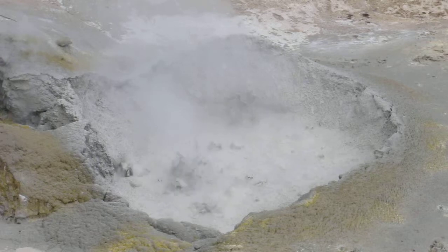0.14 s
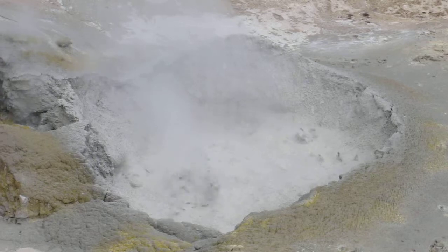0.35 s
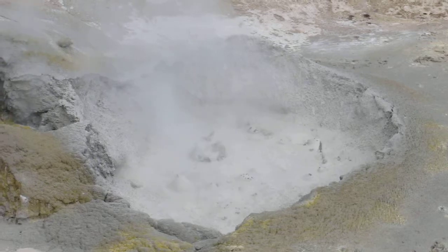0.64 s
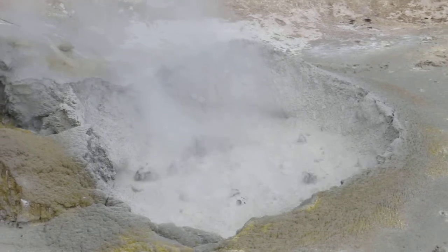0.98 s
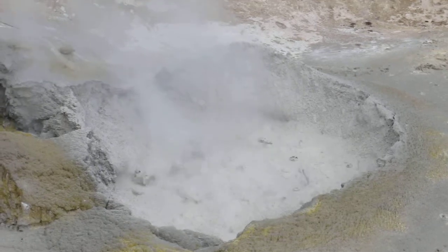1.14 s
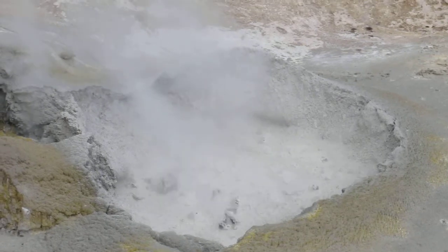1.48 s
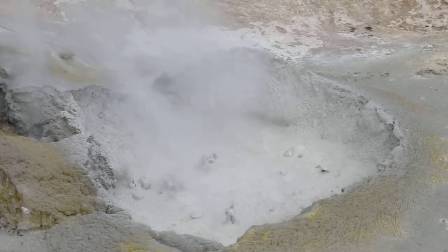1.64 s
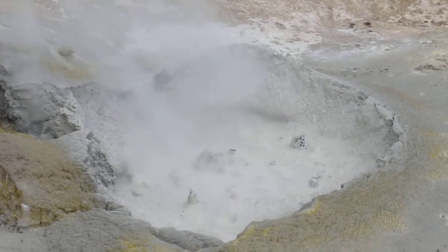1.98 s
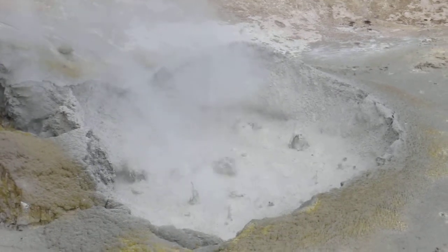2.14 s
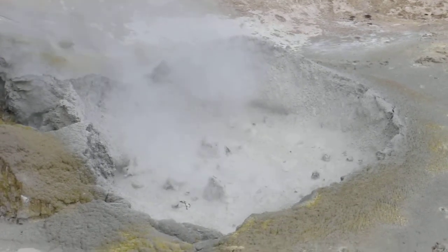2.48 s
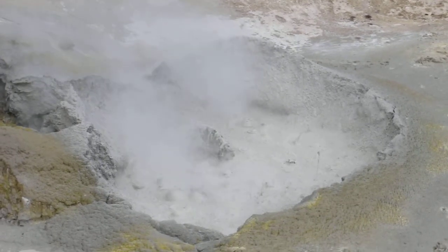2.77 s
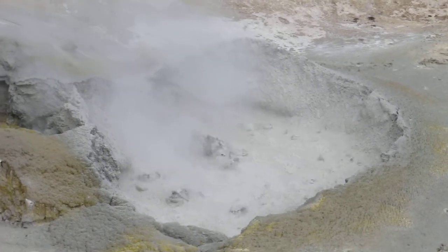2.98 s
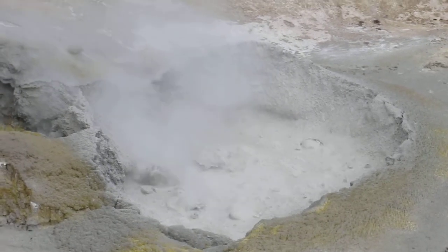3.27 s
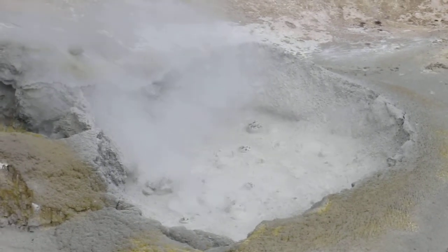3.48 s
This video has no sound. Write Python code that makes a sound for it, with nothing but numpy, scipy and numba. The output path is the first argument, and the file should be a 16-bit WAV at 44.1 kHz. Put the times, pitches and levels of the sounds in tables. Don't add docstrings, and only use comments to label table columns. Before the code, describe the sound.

Thick boiling mud bubbles, plops and spatters over a low churning rumble and steam hiss outdoors

```python
import sys
import numpy as np
from scipy import signal
from scipy.fft import rfft, irfft, next_fast_len
from scipy.io import wavfile
from scipy.ndimage import uniform_filter1d
from numba import njit

SR = 44100
rng = np.random.default_rng(int(sys.argv[2]) if len(sys.argv) > 2 else 0)


def volts(x):
    e = np.asarray(x, float) / 20
    return 10 ** e


def materialize(psi):
    bounded = np.clip(np.atleast_2d(psi).T, -1, 1)
    quanta = np.round(bounded * 32767).astype(np.int16)
    wavfile.write(sys.argv[1], SR, quanta)


N = 159642
PORT_LAG_S = 1.5e-5


def columns(table):
    return np.array(table, float).T


def follow(curve, s):
    return np.interp(s, *columns(curve))


def spectrum(table, hz):
    table_hz, db = columns(table)
    return np.interp(np.log(hz), np.log(table_hz), db)


def level(x, db):
    return x * volts(db) / np.sqrt(np.mean(x ** 2))


def walk(rate):
    hold = int(SR / rate)
    steps = np.repeat(rng.standard_normal(N // hold + 1), hold)
    return 1.3 * uniform_filter1d(uniform_filter1d(steps, hold), hold)[:N]


@njit
def ring(out, start, w, tau, size, glide, lag):
    for k in range(len(start)):
        z = size[k] * np.e / tau[k] + 0j
        step = np.exp(1j * w[k] - 1 / tau[k])
        rise = np.exp(1j * w[k] * glide / tau[k])
        turn = np.exp(1j * w[k] * lag[k])
        for i in range(int(7 * tau[k])):
            z *= step
            step *= rise
            j = start[k] + i
            if 0 <= j < out.shape[1]:
                out[0, j] += i * z.imag
                out[1, j] += i * (z * turn).imag
    return out


def bubbles(s, db, hz, cycles, glide):
    tau = np.maximum(cycles * SR / hz, 1.5)
    lag = PORT_LAG_S * SR * rng.standard_normal(len(s))
    w = 2 * np.pi * np.minimum(hz / (1 + glide), 11000) / SR
    start = (s * SR - tau).astype(np.int64)
    return ring(np.zeros((2, N)), start, w, tau, volts(db), 1. * glide, lag)


def swarm(curve, sizes, trim_db, scatter_db, patchy_db, rate, cycles, glide, count):
    when, pitch, strength = rng.random((count, 3)).T
    s = when * N / SR
    lowest, highest = sizes[0][0], sizes[-1][0]
    hz = lowest * (highest / lowest) ** pitch ** 0.749
    db = follow(curve, s) + trim_db + spectrum(sizes, hz) - scatter_db * np.log(strength)
    patches = walk(rate)[(s * SR).astype(int)]
    return bubbles(s, db + patchy_db * patches, hz, cycles, glide)


def clusters(start, length, db, hz, octaves, count):
    c = rng.random((len(start), count, 4))
    s = start[:, None] + length[:, None] * (.7 * c[..., 0] ** 1.2 + .3 * c[..., 1] ** 2)
    off = octaves * np.log(c[..., 2] / (1 - c[..., 2])) / 1.7
    f = np.clip(hz[:, None] * 2 ** off, 700, 11000)
    per_drop = db + 10 * np.log10(length * SR / count)
    drop_db = per_drop[:, None] - 10 * np.log10(SR / f) - 1.5 * np.log(c[..., 3])
    return bubbles(s.ravel(), drop_db.ravel(), f.ravel(), cycles=1.5, glide=.03)


# start_s, level_db
CHURN_CURVE = [
    (0, -31.5),
    (.9, -30),
    (2, -29.5),
    (3.62, -27.5),
]
# pitch_hz, level_db per bubble
CHURN_BUBBLES = [
    (30, 1.5),
    (40, 13),
    (51, -5),
    (68, 2),
    (120, 6.5),
    (250, 9.5),
    (380, -10),
]


def churn():
    return swarm(CHURN_CURVE, CHURN_BUBBLES, -9.0, 0.25, 0.2, rate=8.4, cycles=1.0, glide=0.046, count=700)


# start_s, level_db
SPATTER_CURVE = [(0, -39), (.2, -40.5), (.32, -38), (.5, -35), (.75, -38), (.95, -38), (1.2, -39),
                 (1.35, -38.5), (1.7, -40), (2.0, -42), (2.15, -40), (2.3, -43), (2.55, -40.5), (2.68, -37),
                 (2.95, -41.5), (3.3, -36.5), (3.62, -38)]
# pitch_hz, level_db per drop
SPATTER_DROPS = [
    (1000, -11),
    (2500, -6.5),
    (5000, -19),
    (10500, -4.5),
]


def falling_drops():
    return swarm(SPATTER_CURVE, SPATTER_DROPS, 4.2, 2.2, 1.2, rate=12, cycles=1.2, glide=0.077, count=10000)


def spits(count=320):
    when, strength, size, pitch = rng.random((count, 4)).T
    s = when * N / SR
    db = follow(SPATTER_CURVE, s) - 6 - 3.5 * pitch - np.log(strength)
    return clusters(s, .0015 + 0.008 * size ** 2, db, 900 * 8.5 ** pitch, octaves=.9, count=10)


# pitch_hz, level_db per Hz
STEAM_COLOUR = [
    (20, -10),
    (330, -4),
    (430, -9.5),
    (1050, -16),
    (1280, -21.5),
    (3000, -28),
    (6000, -31.5),
    (15000, -47),
]


def steam():
    n = next_fast_len(N)
    f = np.maximum(np.fft.rfftfreq(n, 1 / SR), 1)
    mid, side = rfft(rng.standard_normal((2, n)))
    width = np.clip(f / 14000, .03, .7)
    hiss = volts(spectrum(STEAM_COLOUR, f)) * (mid + width * side * np.array([[1], [-1]]))
    spatter = follow(SPATTER_CURVE, np.arange(N) / SR)
    swell = 0.64 * (spatter - spatter.mean())
    flicker = .5 * walk(18)
    total = np.zeros((2, N))
    for k in range(10):
        octave = np.cos(np.clip(np.log2(f / 30) - k, -1, 1) * np.pi / 2) ** 2
        band = irfft(hiss * octave, n)[:, :N]
        total += band * volts(swell * (k > 5) + flicker + .6 * walk(9))
    return level(total, -30)


def wind():
    lowpass = signal.butter(2, 30.2, fs=SR, output="sos")
    buffeting = signal.sosfilt(lowpass, rng.standard_normal((2, N)))
    return level(buffeting * volts(1.0 * walk(4.5)), -36)


# start_s, level_db
SEETHE_CURVE = [
    (0, -46),
    (.5, -34),
    (1, -35),
    (1.4, -39),
    (2.1, -36),
    (2.7, -37),
    (3.15, -31.5),
    (3.62, -34),
]
# pitch_hz, level_db per bubble
SEETHE_BUBBLES = [
    (520, 0),
    (780, 3.5),
    (1100, -11.5),
]


def seethe():
    return swarm(SEETHE_CURVE, SEETHE_BUBBLES, -1.5, 1.5, 1.7, rate=11, cycles=1.085, glide=0.063, count=600)


# start_s (peak), level_db (peak), pitch_hz
GULP_EVENTS = [(.06, -29.5, 111), (.115, -26.5, 280), (.18, -31, 121), (.479, -21.5, 204), (.741, -26, 294),
               (.831, -28, 190), (.968, -24.5, 55), (1.058, -25, 128), (1.095, -23.5, 260),
               (1.322, -25, 77), (1.35, -24.5, 116), (1.382, -21, 207), (1.57, -27.5, 278),
               (1.73, -29, 37.8), (2.09, -25.5, 86.5), (2.134, -23, 278), (2.112, -21.5, 188),
               (2.124, -20, 166), (2.129, -26.5, 122), (.6, -29.5, 150), (1.24, -32, 55), (1.48, -31, 197),
               (1.545, -28, 188), (3.2, -24.5, 60.6), (3.05, -30.5, 59.3), (.9, -32, 280), (2.3, -23, 210),
               (2.435, -29.5, 127), (2.625, -23, 93), (2.684, -23.5, 315), (2.73, -26.5, 40.4),
               (2.921, -21, 193), (3.098, -25.5, 107), (3.15, -24.5, 234), (3.278, -22.5, 247)]


def gulps():
    s, db, hz = columns(GULP_EVENTS)
    return bubbles(s, db + 3, hz, cycles=1.38, glide=0.086)


# start_s (peak), level_db (peak), pitch_hz
PLOP_EVENTS = [(.172, -20, 1820), (.377, -33, 1560), (0.732, -18, 573), (.947, -21, 680), (1.566, -23, 694),
               (1.575, -23, 1210), (2.2232, -18.5, 1550), (2.227, -22, 1480), (2.241, -19, 2880),
               (3.04, -22, 2000), (3.251, -28, 2010), (.396, -27, 1790), (.067, -32, 1600),
               (1.979, -30, 1820), (3.106, -24, 1760), (2.674, -21, 970), (3.268, -19, 1780),
               (3.356, -20, 1190)]


def plops():
    return bubbles(*columns(PLOP_EVENTS), cycles=0.87, glide=0.0053)


# start_s (peak), level_db (peak), pitch_hz
POP_EVENTS = [(.4362, -29, 4700), (0.448, -26.5, 2650), (.5213, -31, 6700), (.5398, -37, 6600),
              (0.679, -28, 7700), (.684, -46, 4260), (0.73, -22.5, 2540), (1.0082, -25.5, 7900),
              (1.27, -38, 3500), (1.52, -29, 8900), (1.786, -31, 6500), (3.268, -27, 6100),
              (2.1182, -32, 4700), (2.043, -31, 3660), (.155, -37, 5340), (2.399, -34, 5040),
              (1.8632, -29, 7400), (2.0219, -28.5, 4900), (2.033, -37, 4400), (2.0427, -27.5, 7750),
              (2.729, -30, 2810)]


def pops():
    s, db, hz = columns(POP_EVENTS)
    return bubbles(s, db + 5, hz, cycles=1.5, glide=0.0092)


# start_s, length_s, level_db, pitch_hz (middle)
SPLASH_EVENTS = [(0.175, 0.014, -36, 2260), (0.195, 0.026, -37, 3680), (0.437, 0.018, -39, 3200),
                 (0.488, 0.022, -36.5, 4000), (0.51, 0.016, -30.5, 4060), (0.535, 0.011, -37, 5650),
                 (0.646, 0.0094, -33, 4970), (0.669, 0.023, -31.5, 5030), (0.703, 0.01, -35, 2500),
                 (0.722, 0.015, -32, 3030), (0.799, 0.031, -35.5, 3780), (0.884, 0.0067, -33.5, 3360),
                 (0.912, 0.014, -40, 3850), (1.1, 0.042, -40.5, 3450), (1.254, 0.018, -38, 4600),
                 (1.356, 0.037, -36.5, 3880), (1.583, 0.022, -34.5, 2230), (1.881, 0.012, -35, 4550),
                 (2.115, 0.0072, -33.5, 3650), (2.129, 0.031, -37, 2280), (2.208, .035, -36, 2270),
                 (2.581, 0.066, -41, 2100), (2.685, 0.03, -39.5, 3270), (2.816, 0.017, -35.5, 3470),
                 (3.047, 0.01, -36.5, 2680), (3.157, 0.022, -37.5, 2780), (3.264, 0.023, -38.5, 2820),
                 (3.301, 0.02, -43, 2340), (3.349, 0.014, -34, 2750), (3.373, 0.0085, -35, 1990),
                 (3.33, 0.0084, -35, 3640), (2.649, 0.0098, -34.5, 3160), (2.667, 0.015, -35, 2570),
                 (3.544, 0.034, -40, 2920)]


def splashes():
    start, length, db, hz = columns(SPLASH_EVENTS)
    return clusters(start, length, db - 3, hz, octaves=.95, count=70)


# start_s (peak), level_db (peak), pitch_hz
BLOP_EVENTS = [(0.428, -32, 670), (0.459, -24, 640), (0.488, -29, 746), (0.536, -29, 579),
               (0.587, -34, 638), (0.806, -31, 759), (1.351, -27, 848), (1.719, -24, 746), (2.47, -28, 501),
               (3.082, -24, 735), (3.139, -22.5, 837), (3.331, -23, 715), (3.522, -26, 570),
               (3.543, -37, 681)]


def blops():
    return bubbles(*columns(BLOP_EVENTS), cycles=0.87, glide=0.0053)


# start_s (peak), level_db (peak), pitch_hz, swell_periods
THUD_EVENTS = [(.5163, -13, 800, .3), (.5164, -16, 2400, .5), (.6421, -4.5, 820, .5), (.6458, -10, 830, .6),
               (.7064, -19, 1700, .8), (.8853, -16, 1000, .4), (1.252, -23, 2550, 1.8),
               (2.0218, -14.5, 1050, .7), (2.0222, -23, 2400, 1.2), (2.1184, -14.5, 3200, 1.1),
               (2.1225, -23, 3000, 1.), (2.9082, -21, 2250, 1.7), (2.135, -22, 480, .8),
               (3.0462, -12, 2500, .6), (3.049, -18, 2800, .5), (3.048, -19, 700, .6)]


def thuds():
    return bubbles(*columns(THUD_EVENTS), glide=.01)


# start_s (peak), level_db (peak)
SNAP_EVENTS = [(0.839, -15.5), (0.9814, -21), (1.2798, -13), (1.3268, -13.5), (1.363, -21), (1.6078, -15.5),
               (1.6933, -17), (2.0418, -27), (2.368, -18), (2.4229, -27), (2.577, -23), (2.723, -19.5),
               (2.792, -26), (.7055, -24), (.6715, -22), (0.724, -19), (1.826, -24), (2.0203, -21),
               (2.8514, -20)]


def snaps():
    s, db = columns(SNAP_EVENTS)
    total = np.zeros((2, N))
    for hz, part_db in ((2400., -11.5), (4300., -11.5), (6800., -7.5), (10200., -5)):
        total += bubbles(s, db + part_db, np.full(len(s), hz), cycles=0.9, glide=0.11)
    return total


def bank_scatter(mud):
    t = np.arange(3000) / SR
    same, own = rng.standard_normal(len(t)), rng.standard_normal((2, len(t)))
    tail = (same + 0.62 * own) * np.exp(-t / .015) * (t > .002)
    tail *= volts(-12) / np.sqrt(np.sum(tail ** 2, axis=1, keepdims=True))
    high = signal.sosfilt(signal.butter(2, 900, "high", fs=SR, output="sos"), mud)
    return signal.fftconvolve(high, tail, axes=1)[:, :N]


def scene():
    mud = churn() + falling_drops() + spits() + seethe()
    mud += gulps() + plops() + pops() + splashes() + blops() + thuds() + snaps()
    return mud + bank_scatter(mud) + steam() + wind()


def microphone_ports(dry):
    out = []
    for x, hz, q, db in zip(dry, (5480, 7030), (2.65, 3.73), (-1.61, -5)):
        w = 2 * SR * np.tan(np.pi * hz / SR)
        b, a = signal.bilinear([w * w], [1, w / q, w * w], SR)
        out.append(volts(db) * signal.lfilter(b, a, x))
    out[1] = signal.sosfilt(signal.butter(1, 25, "high", fs=SR, output="sos"), out[1])
    return np.array(out)


def preamp(x):
    rolloff = np.vstack([signal.butter(2, 8220, fs=SR, output="sos"),
                         signal.butter(2, 21, "high", fs=SR, output="sos")])
    top = signal.ellip(8, .2, 60, 15250, fs=SR, output="sos")
    soften = signal.butter(1, 6000, fs=SR, output="sos")
    hiss = signal.sosfilt(soften, rng.standard_normal((2, N)))
    return signal.sosfilt(top, signal.sosfilt(rolloff, x) + volts(-53.5) * hiss)


def roll_off(x):
    return signal.sosfilt(signal.butter(12, 15670, fs=SR, output="sos"), x)


def record(dry):
    mix = preamp(microphone_ports(dry))
    return roll_off(mix)


dry = scene()
out = record(dry)
materialize(out)
```